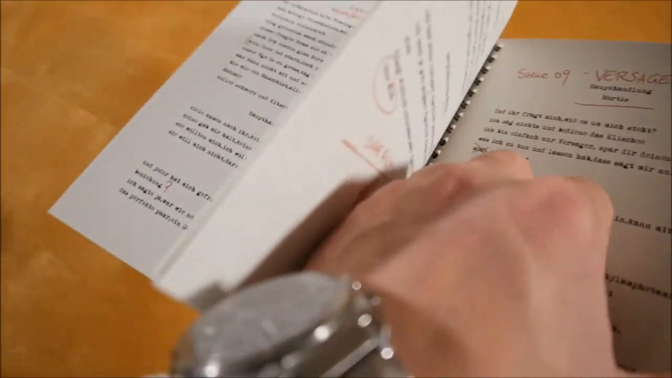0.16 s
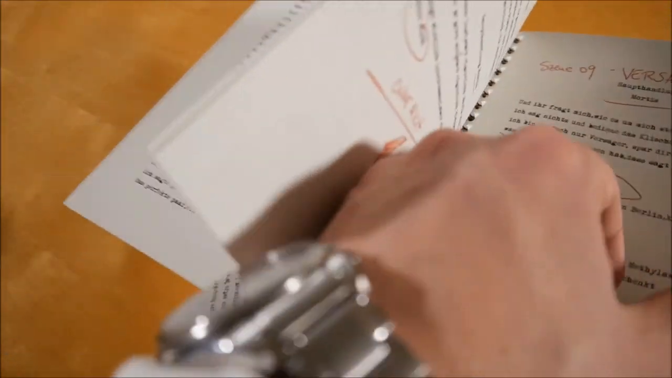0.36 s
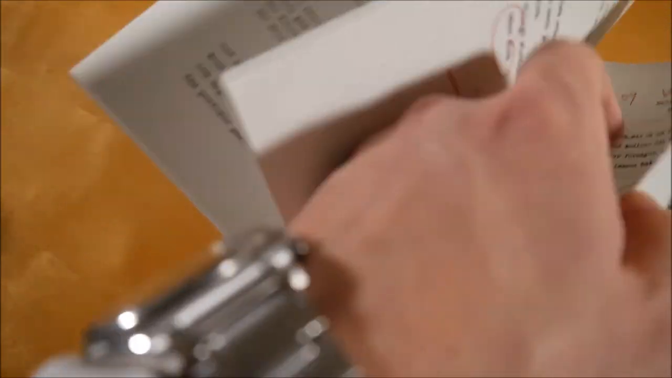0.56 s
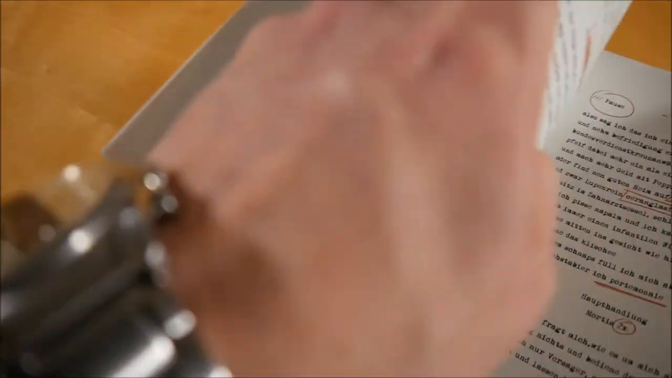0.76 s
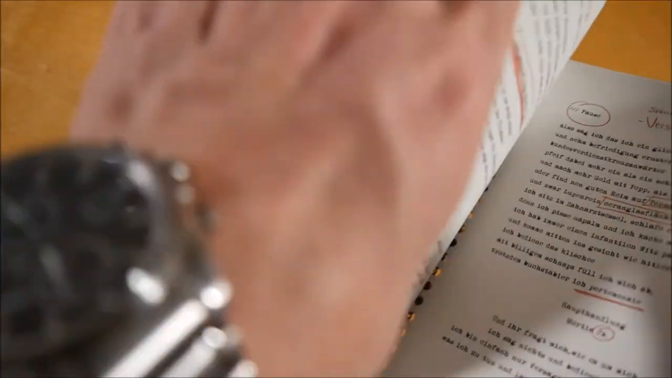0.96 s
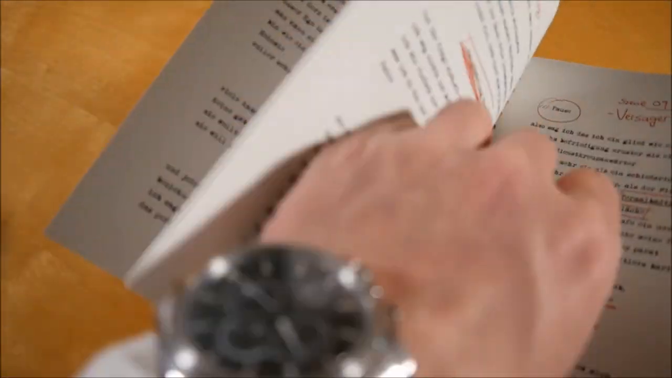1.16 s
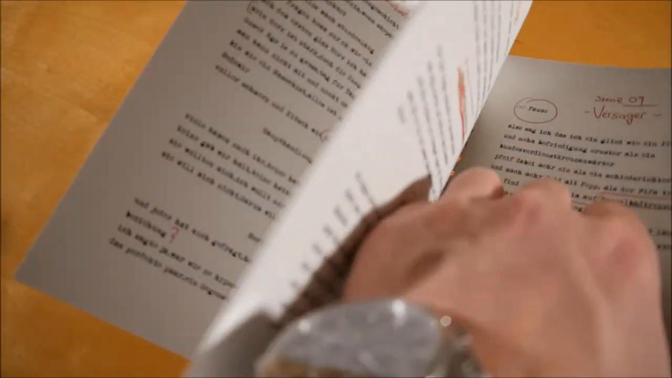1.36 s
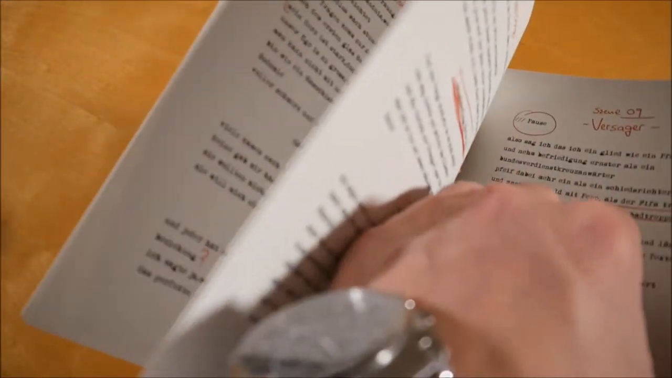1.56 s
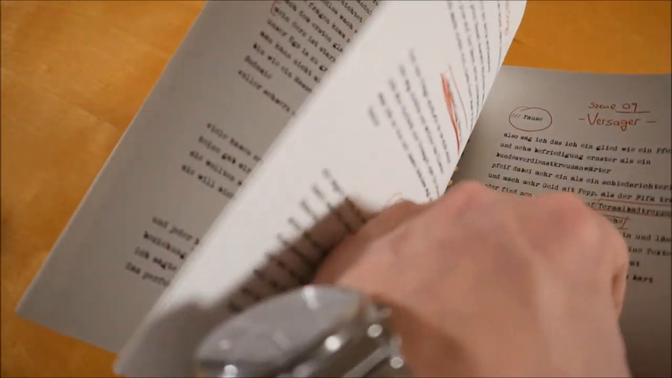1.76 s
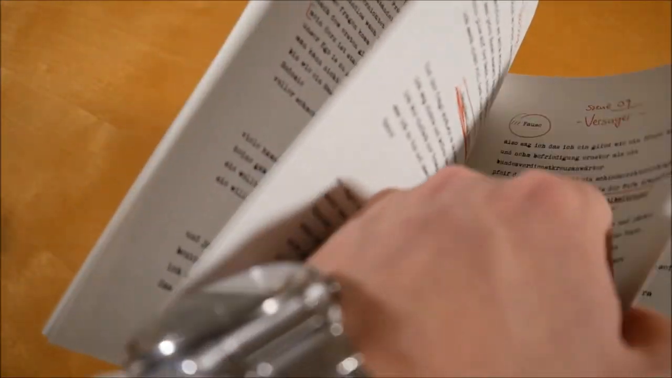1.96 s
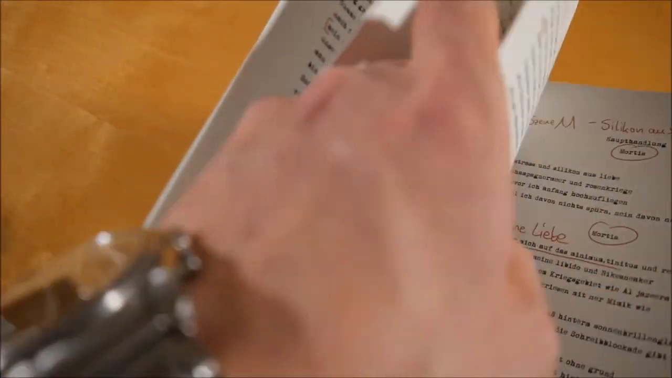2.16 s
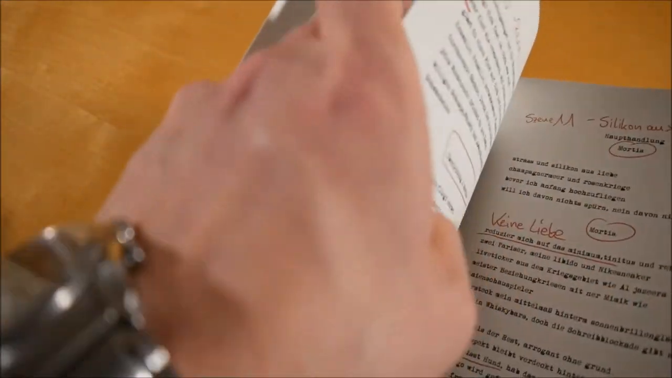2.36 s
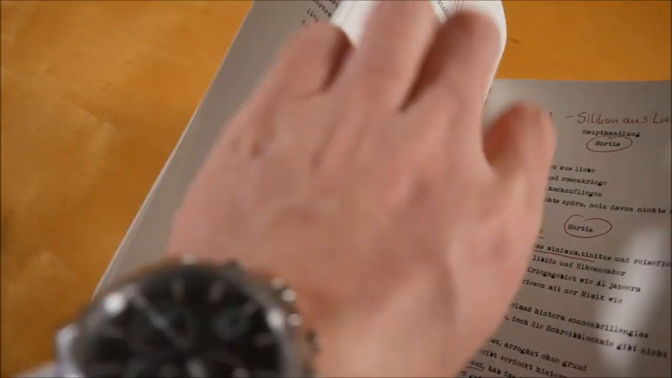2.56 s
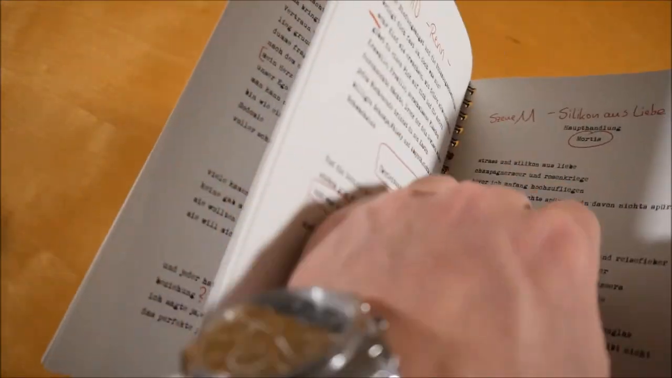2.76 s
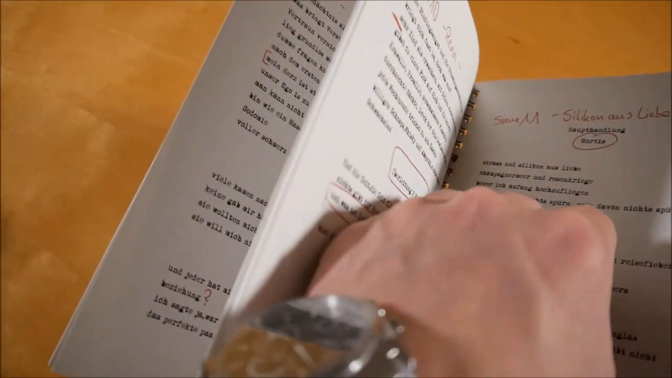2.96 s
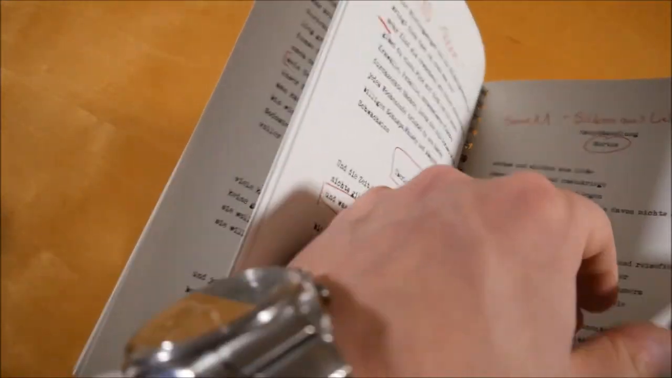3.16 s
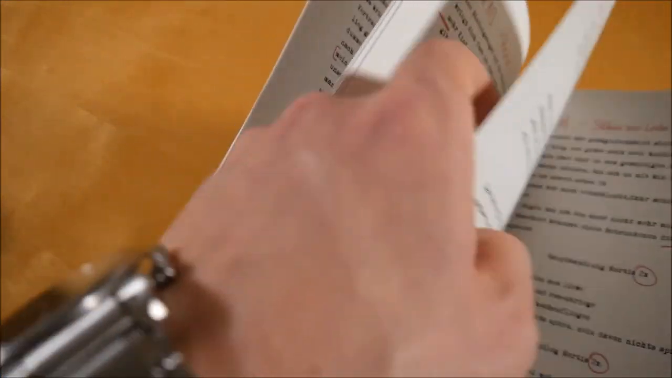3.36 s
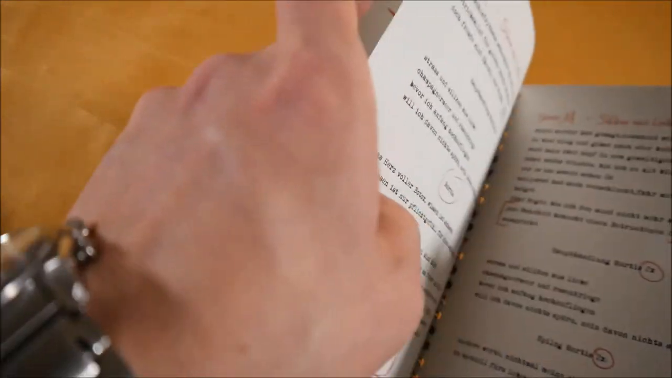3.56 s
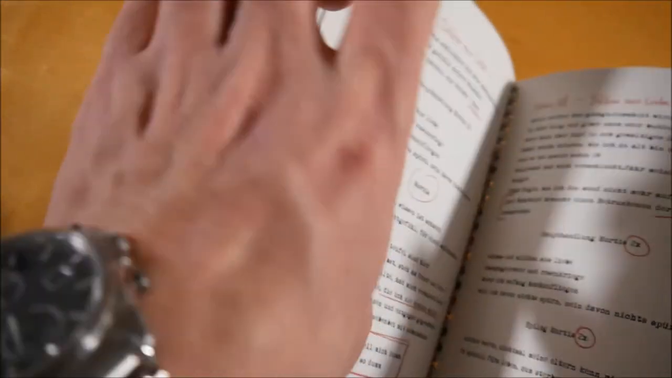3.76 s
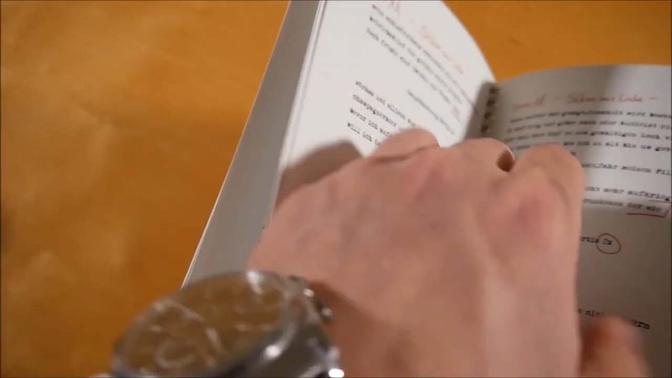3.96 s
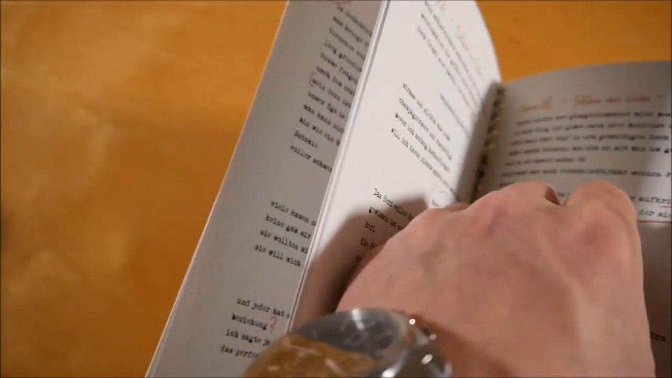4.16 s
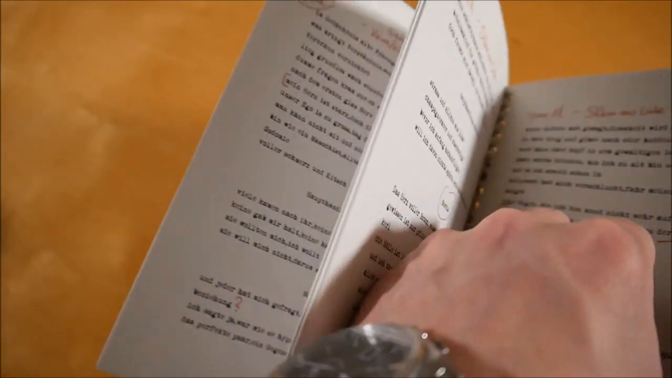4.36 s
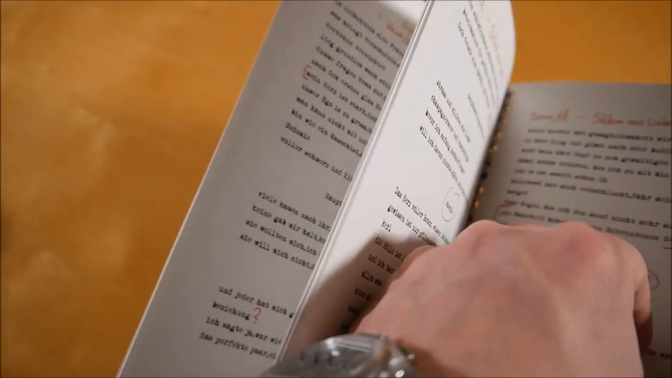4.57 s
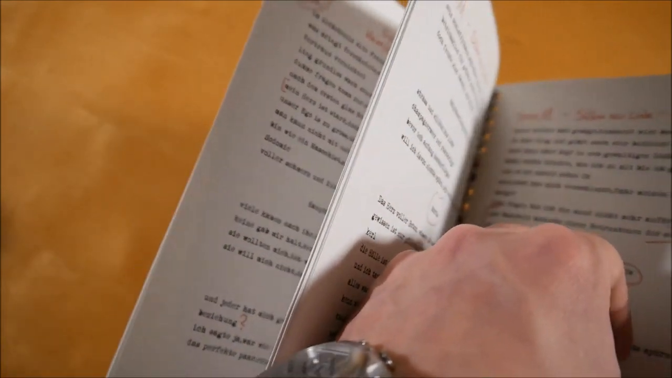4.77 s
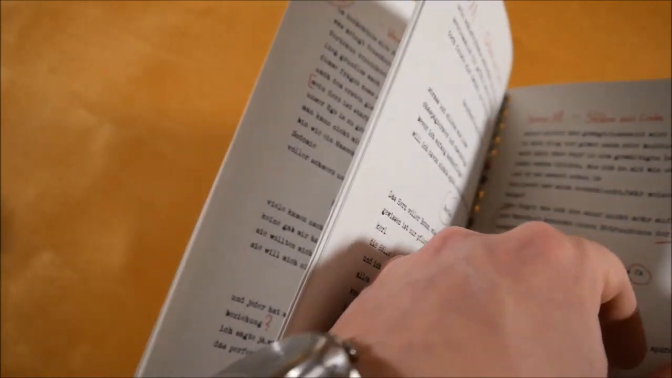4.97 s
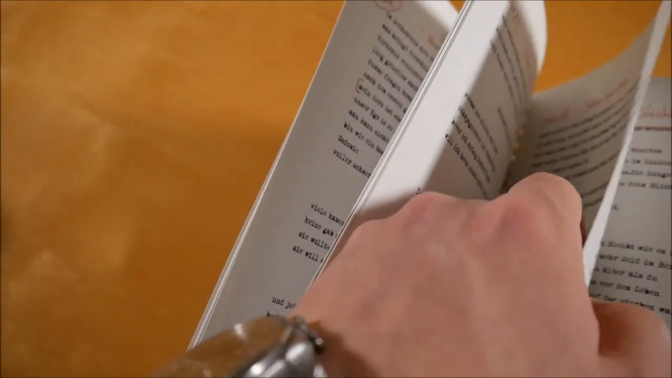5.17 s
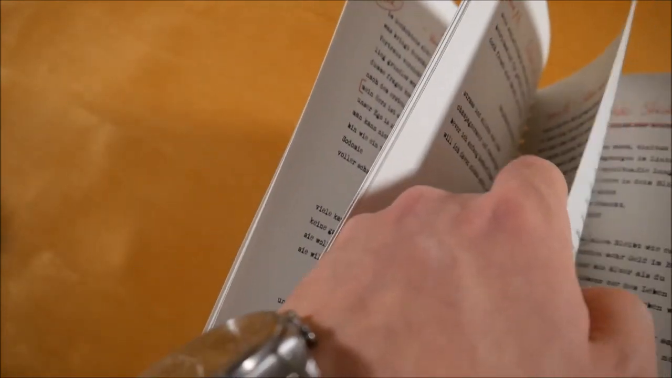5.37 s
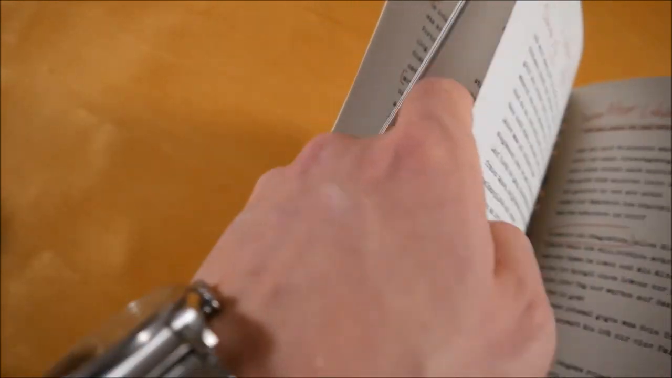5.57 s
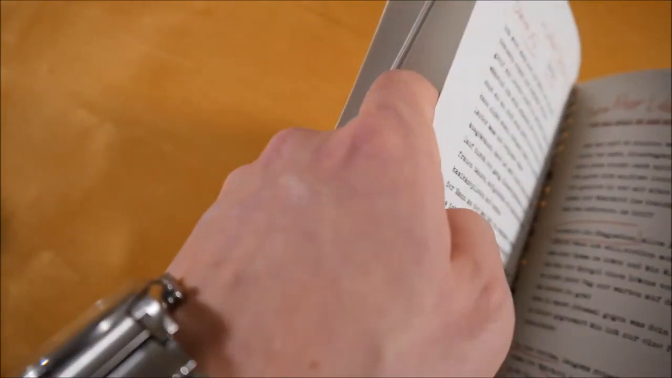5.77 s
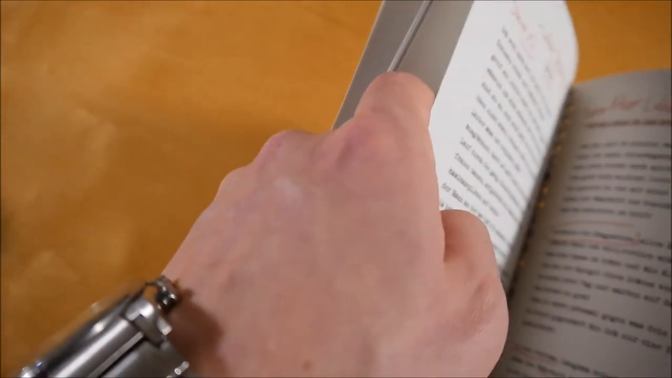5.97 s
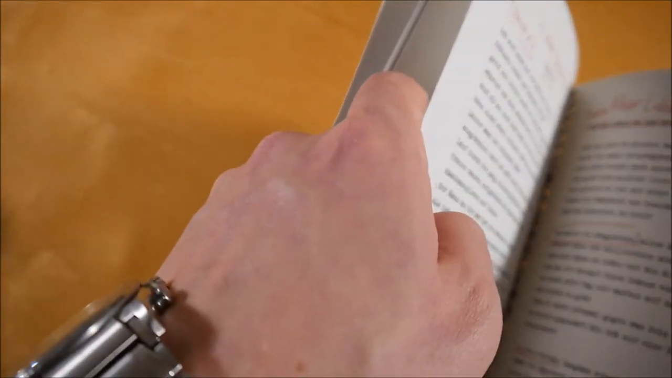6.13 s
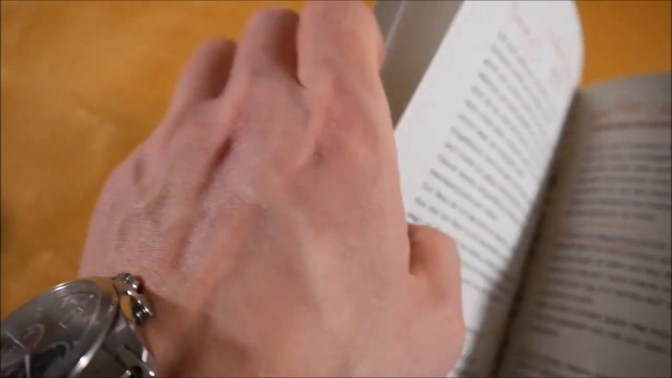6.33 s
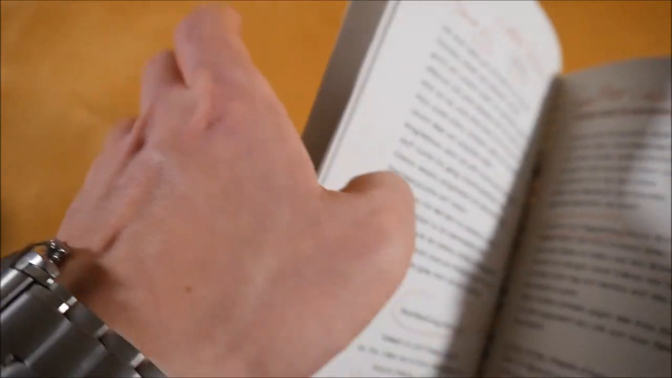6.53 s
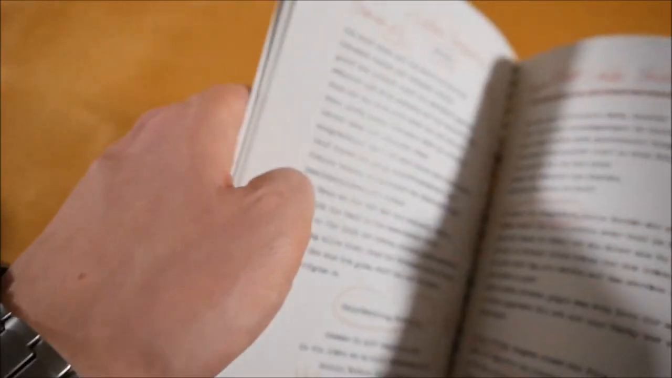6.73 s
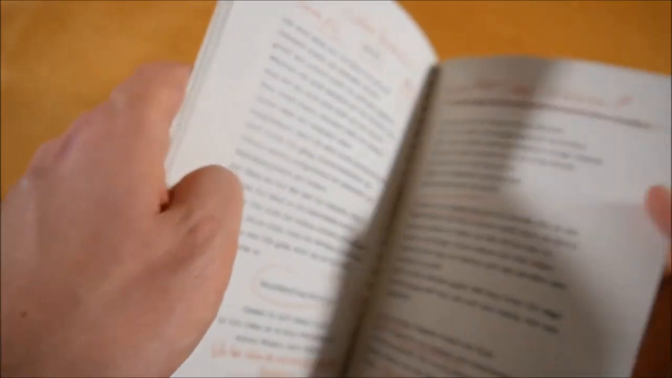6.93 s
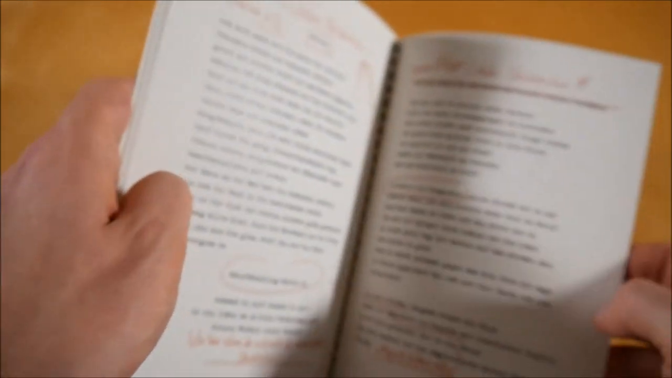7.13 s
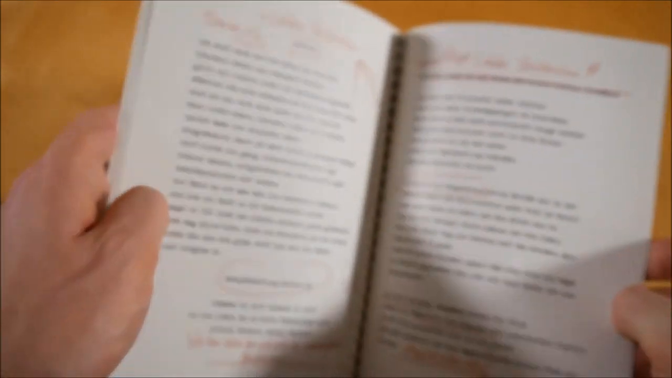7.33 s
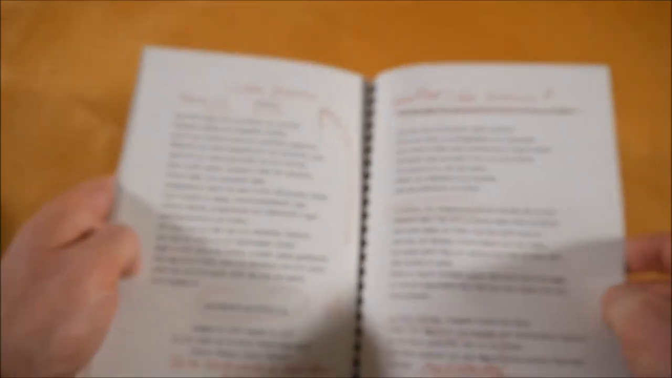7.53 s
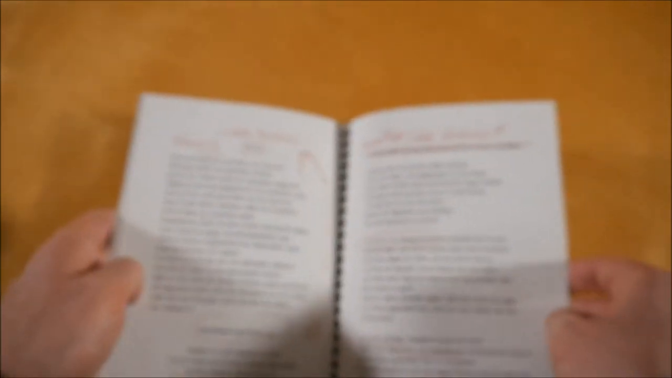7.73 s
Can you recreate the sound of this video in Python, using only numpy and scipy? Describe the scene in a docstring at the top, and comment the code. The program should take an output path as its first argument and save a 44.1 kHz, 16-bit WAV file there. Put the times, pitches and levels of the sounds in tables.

```python
"""Leafing through a spiral-bound booklet

A hand turns the pages of a paper booklet on a wooden desk, close by in a small, quiet room.
Filtered, crackly noise makes the sheets slide; short bursts make them snap and flop onto the stack.
A fingertip drags, or sticks and slips in short chirps. Decaying tones ring the plucked spiral and,
at the end, the desk under the knocking spine. A faint hum with quick ticks lies underneath."""
import sys
import numpy as np
from scipy import signal
from scipy.fft import rfft, irfft, next_fast_len
from scipy.io import wavfile

SR = 44100
rng = np.random.default_rng(int(sys.argv[2]) if len(sys.argv) > 2 else 0)


def pcm_store(signal):
    """Save signal as 16-bit PCM."""
    levels = np.round(np.clip(np.atleast_2d(signal), -1, 1) * 32767)
    wavfile.write(sys.argv[1], SR, levels.astype(np.int16).T)


N = 348390

# Colour of fibres that brush past each other. Each row: frequency in Hz, level in dB per Hz.
FIBRE_COLOUR = [(450, 3.5), (1100, 6), (4500, 1.5), (7500, -4)]


def from_db(db):
    """Decibels to gain."""
    return 10 ** (np.asarray(db) / 20)


def rms_one(x):
    """Scale to unit power."""
    return x / np.sqrt(np.mean(x ** 2) + 1e-20)


def at_hz(points, hz):
    """Read a spectrum on a log-frequency axis."""
    f, value = np.transpose(points)
    return np.interp(np.log(hz + 1), np.log(f), value)


def add(out, s, sound):
    """Mix a short sound in at time s, in seconds."""
    start = max(0, round(s * SR))
    part = out[..., start:start + sound.shape[-1]]
    part += sound[..., :part.shape[-1]]


def cut(x, hz, kind, order=2):
    """Butterworth low-pass ("low") or high-pass ("high")."""
    sections = signal.butter(order, np.clip(hz, 10, .45 * SR), kind, fs=SR, output="sos")
    return signal.sosfilt(sections, x)


def resonate(x, hz, width_hz):
    """One resonance with a gain of about 1 at its top."""
    r = np.exp(-np.pi * width_hz / SR)
    feedback = [1, -2 * r * np.cos(2 * np.pi * hz / SR), r * r]
    return signal.lfilter(np.array([1, 0, -1]) * (1 - r * r) / 2, feedback, x)


def resonate_twice(x, hz, width_hz):
    """The same resonance two times over, for steeper sides."""
    return resonate(resonate(x, hz, width_hz), hz, width_hz)


def drift(rate):
    """Smooth random wander of unit power that heads for a new value rate times a second."""
    knots = rng.standard_normal(4096)
    return rms_one(np.interp(np.arange(N) / SR * rate, np.arange(len(knots)), knots))


def spread(pair, spectrum):
    """Colour two unrelated signals and mix them to a left and right that agree least in the bass; rms 1."""
    # How alike left and right are. Each row: frequency in Hz, likeness from 0 to 1.
    likeness = [(200, 0.12), (1500, 0.65), (14000, 0.65)]
    size = next_fast_len(N + 4096)
    hz = np.arange(size // 2 + 1) * SR / size
    mid, side = rfft(pair, size) * from_db(at_hz(spectrum, hz))
    alike = np.clip(at_hz(likeness, hz), 0, .999)
    left_right = np.sqrt(1 + alike) * mid + np.sqrt(1 - alike) * side * [[1], [-1]]
    return rms_one(irfft(left_right, size)[:, :N])


def swell_and_fade(progress, peak, steepness=1.256):
    """The speed of a stroke: up from rest until the share peak of its length, then back to rest."""
    rise_and_fall = np.interp(progress, [0, np.clip(peak, .05, .9), 1], [0, 1, 0])
    return np.sin(np.pi / 2 * rise_and_fall) ** steepness


def disperse(x):
    """Bending waves cross a sheet treble first, so each click becomes a tiny falling chirp."""
    bend_lag_s = 0.001315   # sets the delay: it grows as 1 / sqrt(frequency) and is zero at the very top
    size = next_fast_len(len(x) + 4096)
    hz = np.arange(size // 2 + 1) * SR / size
    cycles = bend_lag_s * (2 * np.sqrt(1000 * hz) - hz * np.sqrt(2000 / SR))
    return irfft(rfft(x, size) * np.exp(-2j * np.pi * cycles), size)[:len(x)]


def friction(spectrum, catches_per_s, catch_db, judder_db):
    """Countless fibres brush past each other; some catch and let go with a tick, and the contact judders."""
    catches = (rng.random(N) < catches_per_s / SR) * rng.standard_normal((2, N))
    fibres = rng.standard_normal((2, N)) + from_db(catch_db) * rms_one(catches)
    judder = from_db(judder_db * np.clip(drift(110), -2, 2))
    return spread(fibres * judder, spectrum)


def ringing(blows, modes, t60_s):
    """Each blow sets the modes of a body ringing; they lose 60 dB in t60_s seconds."""
    out, t = np.zeros(N), np.arange(SR // 2) / SR
    ring = np.zeros(len(t))
    for k, (hz, db) in enumerate(modes):
        ring += (-1) ** k * from_db(db - 60 * t / t60_s) * np.sin(2 * np.pi * hz * t)
    for s, level_db in blows:
        add(out, s, from_db(level_db) * ring)
    return out


def quiet_room():
    """Steady, coloured noise is the hush of the room."""
    # Colour of the hush. Each row: frequency in Hz, level in dB per Hz.
    hush_colour = [(60, -25), (140, -13.5), (300, -19.5), (450, -20.5), (1500, -25), (15000, -38.5)]
    return from_db(-63.3) * spread(rng.standard_normal((2, N)), hush_colour)


def hum_and_ticks(tick_hz=790, hum_hz=208, tick_db=-69, hum_db=-68.5):
    """Narrow noise makes a faint hum; noise bursts that die away 25 times a second make faint ticks."""
    since_tick = (np.arange(N) / SR - .026) % .04
    noise = rng.standard_normal((2, N))
    ticks = resonate_twice(noise[0] * np.exp(-since_tick / .016), tick_hz, 380)
    hum = resonate_twice(noise[1], hum_hz, 40)
    return from_db(tick_db) * rms_one(ticks) + from_db(hum_db) * rms_one(hum)


def room(x, dull_hz=7000, shared=0.92, build_s=0.00067, t60_s=0.26):
    """Reflections from desk and walls thicken and die away, the treble first."""
    t = np.arange(SR // 2) / SR
    noise = rng.standard_normal((3, len(t)))
    echoes = cut(shared * noise[0] + noise[1:], 123, "high")
    lows = cut(echoes, dull_hz, "low", order=1)
    highs = (echoes - lows) * from_db(-90 * t)   # an extra loss of 90 dB a second
    tail = (lows + highs) * from_db(-60 * t / t60_s) * (1 - np.exp(-t / build_s))
    return signal.fftconvolve(x, rms_one(tail) / np.sqrt(len(t)), axes=1)[:, :N]


def desk_knocks():
    """The spine knocks on the desk, and the desk top rings."""
    # Knocks. Each row: time in seconds, level in dB.
    knock_times = [(7.743, -37), (7.766, -34)]
    # Tones of the desk top. Each row: frequency in Hz, level in dB.
    desk_modes = [(168, -5), (214, -4), (286, 1), (380, -2)]
    return ringing(knock_times, desk_modes, t60_s=0.14)


def spiral_plucks():
    """A sheet catches in the spiral and plucks it, and the coil rings."""
    # Plucks. Each row: time in seconds, level in dB.
    pluck_times = [(.689, -22), (.7055, -28)]
    # Tones of the coil. Each row: frequency in Hz, level in dB.
    coil_modes = [(1258, 0), (1746, -7), (1890, -6)]
    return ringing(pluck_times, coil_modes, t60_s=.15)


def stutter(start, length_s, count, first_db, last_db, hz):
    """The finger speeds up and slows, so slips crowd and weaken midway; rows (s, peak dB, Hz)."""
    midway_gap = 0.5      # gap between slips at the fastest point, as a share of the mean gap
    midway_loss_db = 8    # quick slips store less strain
    tightening = 0.09     # share by which the pitch rises over a run as the page is pulled taut
    way = np.linspace(-1, 1, round(count))
    times = start + length_s * (1 + midway_gap * way + (1 - midway_gap) * way * way * way) / 2
    levels_db = np.linspace(first_db, last_db, len(way)) - midway_loss_db * (1 - way * way)
    return zip(times, levels_db, hz * (1 + tightening * (1 + way) / 2))


def slips(swell_s=0.00083, rasp=16, overshoot=0.984, sag_s=0.0004):
    """Each slip shakes the page in a few cycles that sag to its pitch; hard slips rasp, gentle ones chirp."""
    # Runs of slips of a fingertip. Each row: start in seconds, length in seconds, number of slips,
    # level of the first slip in dB, level of the last slip in dB, starting pitch in Hz.
    slip_runs = [(.938, 0.017, 2, -23, -9.5, 2600), (2.188, 0.125, 11, -29, -27, 1830),
                 (2.4895, .026, 2, -22, -29, 1700)]
    out, t = np.zeros(N), np.arange(SR // 40) / SR
    swell = np.sqrt(t / swell_s) * np.exp(-t / swell_s / 2)
    bent_t = t + overshoot * sag_s * (1 - np.exp(-t / sag_s))   # time runs fast at first: a higher pitch
    for run in slip_runs:
        for s, level_db, hz in stutter(*run):
            scratch = rms_one(resonate_twice(rng.standard_normal(len(t)), hz, .8 * hz))
            chirp = swell * (np.sin(2 * np.pi * hz * bent_t) + rasp * from_db(level_db) * scratch)
            add(out, s, from_db(level_db) * chirp / np.abs(chirp).max())
    return out


def drags(grain_db=-2):
    """A pressed fingertip scrapes in one resonance over a crackly grain; it swells slowly and stops sooner."""
    # Drags along a page held flat. Each row: start in seconds, length in seconds, level in dB,
    # centre of the scrape in Hz, width of the scrape in Hz.
    drag_strokes = [(1.075, .125, -41, 2200, 2600), (2.378, .026, -41, 2500, 2400),
                    (2.612, .075, -42.5, 2100, 1900), (3.87, .11, -46, 1380, 620),
                    (6.18, .22, -50.5, 2000, 3400), (6.73, .26, -49.5, 1420, 900)]
    skin = friction(FIBRE_COLOUR, catches_per_s=540, catch_db=-1.5, judder_db=2)
    out = np.zeros((2, N))
    for start, length_s, level_db, hz, width_hz in drag_strokes:
        i = np.arange(int(start * SR), int((start + length_s) * SR))
        grain = rms_one(cut(skin[:, i], hz, "low", order=1))
        scrape = rms_one(resonate_twice(skin[:, i], hz, width_hz)) + from_db(grain_db) * grain
        speed = swell_and_fade((i / SR - start) / length_s, peak=0.63)
        add(out, start, from_db(level_db) * speed * scrape)
    return out


def flops(patter_db=-24, soft_hz=2200):
    """A landing page squeezes out air and patters to rest; a heavy hand thuds lower than a sheet."""
    # Landings on the stack. Each row: time in seconds, peak level in dB, lowest pitch of the thud in Hz.
    landings = [(0.392, -31.5, 85), (.799, -15.5, 169), (1.003, -29.5, 114), (1.39, -39, 97),
                (2.541, -26, 222), (2.868, -33.5, 72), (3.788, -27.5, 83), (4.127, -31, 84),
                (4.425, -41.5, 75), (4.467, -24.5, 108), (5.172, -38, 130), (5.66, -25.5, 207),
                (7.766, -21.5, 300)]
    # Air cushion and stack under a page. Each row: frequency in Hz, level in dB, time to fall 60 dB in seconds.
    stack_modes = [(136, -10.5, 0.018), (242, 9, 0.0031), (676, -2.5, 0.0068)]
    out, t = np.zeros(N), np.arange(SR // 5) / SR
    modes = sum(from_db(db - 60 * t / t60) * np.sin(2 * np.pi * hz * t) for hz, db, t60 in stack_modes)
    for s, level_db, lowest_hz in landings:
        settle_s = 0.0022 * 2 ** (-level_db / 12.5)   # a landing 12.5 dB harder settles in half the time
        patter = from_db(patter_db) * np.exp(-t / settle_s) * rng.standard_normal(len(t))
        push = (t == 0) + patter
        thud = cut(signal.fftconvolve(push, modes)[:len(t)], soft_hz, "low")
        thud = cut(thud, lowest_hz, "high", order=3)
        add(out, s, from_db(level_db) * thud / np.abs(thud).max())
    return out


def snap(hz, crisp_db, ripple_db=-17, ripple_cycles=2.55, shiver_db=-33, shiver_s=0.026,
         width=0.96, crack_hz=4000):
    """A patch of paper flips in one jolt; bending waves ripple back and the sheet shivers on."""
    t = np.arange(SR // 8) / SR
    ripple = from_db(ripple_db) * np.exp(-t * hz / ripple_cycles)
    ripple = ripple + from_db(shiver_db) * np.exp(-t / shiver_s)
    # one noise shared by both sides, plus a little of its own for each
    noise = rng.standard_normal(len(t)) + 0.35 * rng.standard_normal((2, len(t)))
    force = (t == 0) + ripple * noise
    body = cut(resonate(force, hz, width * hz), hz * 0.15, "high")
    body = cut(body, hz * 7, "low", order=1)
    crack = resonate(force, crack_hz, 1600) - from_db(-4) * resonate(force, 7700, 6600)
    both = body / np.abs(body).max() + from_db(crisp_db) * crack / np.abs(crack).max()
    sound = np.array([disperse(side) for side in both])
    return sound / np.abs(sound).max()


def snaps():
    """Sheets buckle or flick their edges free; the gentler the snap, the crisper."""
    # Snaps. Each row: time in seconds, peak level in dB, pitch of the bent patch in Hz.
    snap_events = [(0.0116, -10.5, 1310), (0.03, -17.5, 1680), (.042, -17.5, 1190), (.085, -17.5, 1470),
                   (0.108, -14, 4070), (.119, -17.5, 3970), (0.1415, -14, 4540), (0.156, -19.5, 4900),
                   (0.324, -25, 850), (0.366, -26, 1660), (0.45, -27, 780), (0.521, -23, 2600),
                   (.555, -24, 4130), (.623, -20, 1090), (0.6702, -18.5, 2370), (0.6811, -10.5, 1880),
                   (0.6877, -8.5, 1430), (0.7049, -2, 1430), (.748, -13, 3560), (0.7984, -17.5, 1220),
                   (1.566, -38, 1920), (1.614, -37, 2270), (2.033, -10.5, 1570), (2.121, -20.5, 2900),
                   (2.139, -10.5, 2500), (2.541, -20.5, 1270), (3.193, -21, 4400), (3.215, -22.5, 2780),
                   (3.338, -26, 4000), (3.579, -27.5, 4470), (3.607, -27, 4970), (3.618, -28, 3000),
                   (3.632, -30, 5170), (3.667, -22.5, 2300), (3.725, -18, 3900), (3.737, -36, 2500),
                   (3.884, -21, 1440), (3.899, -26.5, 1500), (3.931, -22.5, 1760), (3.943, -27, 2160),
                   (4.127, -29, 965), (4.175, -27.5, 2420), (4.217, -31, 1180), (4.296, -30, 1500),
                   (4.4552, -18, 1220), (4.468, -27, 1260), (5.041, -29.5, 3800), (5.11, -27, 1790),
                   (5.166, -29, 1520), (5.237, -31.5, 4450), (5.567, -43, 4500), (5.6576, -13, 1160),
                   (6.411, -29.5, 1780), (6.419, -23, 1300), (6.434, -20.5, 1630), (6.722, -36, 2200),
                   (7.393, -36.5, 2330), (7.548, -35.5, 2900), (7.74, -17, 1000), (7.764, -16.5, 1190),
                   (7.860, -25.5, 1650), (7.865, -25, 1670)]
    out = np.zeros((2, N))
    for s, level_db, hz in snap_events:
        crisp_db = -33.5 - 0.3 * level_db   # the bright crack gains 0.3 dB for each dB gentler
        add(out, s, from_db(level_db) * snap(hz, crisp_db))
    return out


def crinkle(size_spread_db=4.5, flurry_db=4, dullness=0.79):
    """Tiny creases give way in flurries, each with a random size and one of twelve pitches; rms 1."""
    sizes = from_db(size_spread_db * np.minimum(rng.exponential(1, N), 2)) * rng.choice([-1, 1], N)
    creases_per_s = 95 * from_db(flurry_db * drift(20))
    ticks = sizes * (rng.random(N) < creases_per_s / SR)
    pitches_hz = np.geomspace(900, 7000, 12)
    dealt = rng.integers(0, len(pitches_hz), N)
    out = np.zeros(N)
    for k, hz in enumerate(pitches_hz):
        # the tiny offset keeps the filter clear of extremely small numbers
        out += resonate(ticks * (dealt == k) + 1e-18, hz, .5 * hz) / hz ** dullness
    return rms_one(disperse(out))


def under_page(pair):
    """An echo from the changing gap under the moving page keeps shifting the colour of the rub."""
    n = np.arange(N)
    lag = 0.000483 * SR * np.exp(0.41 * drift(12))   # in samples
    echo = np.array([np.interp(n - lag, n, channel) for channel in pair])
    return rms_one(pair - from_db(-11) * echo)


def sliding(flex_db=-11, flex_steepness=3.02, crumple_db=-41):
    """Strokes speed up and come to rest; the more of a sheet moves, the lower it rubs and rumbles along."""
    # Strokes of a finger or sheet over paper. Each row: start in seconds, length in seconds,
    # rub level in dB, centre of the rub in Hz, hiss level in dB.
    slide_strokes = [(.0, 0.25, -37, 944, -40), (0.224, 0.37, -50.5, 1300, -56),
                     (0.427, 0.15, -44.5, 1130, -56), (0.563, 0.22, -42, 1340, -47.5),
                     (0.672, 0.17, -40, 2430, -42), (0.727, 0.43, -42.5, 1840, -52),
                     (0.973, 0.076, -42, 2090, -72), (1.105, 0.38, -50.5, 2190, -52),
                     (1.332, 1, -62.5, 1800, -70), (1.987, 0.44, -47.5, 1940, -54),
                     (2.39, 0.32, -48, 1950, -54), (2.657, 0.31, -50.5, 2660, -51),
                     (3.21, 0.11, -41, 1450, -54), (3.3, 0.1, -48, 1630, -48.5),
                     (3.372, 0.2, -46, 3360, -53.5), (3.512, 0.48, -47.5, 1820, -53.5),
                     (3.713, 0.15, -38.5, 1430, -45), (3.94, 0.085, -38.5, 1430, -41.5),
                     (3.948, 0.34, -57, 1970, -53.5), (4.189, 0.64, -54, 1010, -58.5),
                     (4.351, 0.027, -45.5, 1260, -46), (4.637, 0.061, -41.5, 1460, -61),
                     (4.716, 0.054, -47, 950, -53), (4.972, 0.56, -51, 1740, -66),
                     (5.12, 0.17, -53, 1450, -60), (5.41, 0.39, -48.5, 3020, -61),
                     (6.256, 0.29, -52, 1880, -55.5), (6.983, 0.052, -51, 1060, -67),
                     (6.998, 0.36, -53, 1450, -53), (7.377, 0.25, -47, 2050, -65),
                     (7.59, 0.1, -44, 1110, -52.5), (7.68, 0.84, -48.5, 1050, -57)]
    # Colour of a bending sheet. Each row: frequency in Hz, level in dB per Hz.
    flex_colour = [(50, -9.5), (160, 6.5), (480, 6), (720, 7.5), (1100, -4), (1800, -100.5)]
    # Colour of sheet sliding over sheet. Each row: frequency in Hz, level in dB per Hz.
    hiss_colour = [(4000, -5), (5500, 2), (6800, 0.5), (8200, -2), (10500, 2), (15500, -14.5)]
    flex = friction(flex_colour, catches_per_s=180, catch_db=-12.0, judder_db=6.0)
    rub = under_page(friction(FIBRE_COLOUR, catches_per_s=500, catch_db=-5, judder_db=2.5))
    hiss = friction(hiss_colour, catches_per_s=1200, catch_db=-8, judder_db=1.8)
    creases, out = crinkle(), np.zeros((2, N))
    for start, length_s, rub_db, hz, hiss_db in slide_strokes:
        i = np.arange(max(0, int(start * SR)), min(N, int((start + length_s) * SR)))
        progress = (i / SR - start) / length_s
        size = 1500 / hz   # how much of the sheet moves
        scrape = rms_one(resonate(rub[:, i], hz, 1.5 * hz))
        rumble = from_db(flex_db) * size ** flex_steepness * flex[:, i]
        # forceful strokes crumple the sheet; gentle ones only brush it
        crumple = from_db(.55 * (rub_db - crumple_db)) * min(size, 1)
        rubbing = from_db(rub_db) * (scrape + rumble + crumple * creases[i]) / np.hypot(1, crumple)
        hissing = from_db(hiss_db) * hiss[:, i]
        speed = swell_and_fade(progress, peak=0.13)
        add(out, start, speed * (rubbing + hissing))
    return out


def scene():
    """The booklet, a little to the right, in a quiet room; light paper radiates little bass."""
    # Resonances of the open booklet and the desk under it. Each row: frequency in Hz, width in Hz, level in dB.
    book_resonances = [(320, 140, -6.5), (675, 150, -0.5)]
    paper = sliding() + drags() + snaps() + flops() + slips()
    body = sum(from_db(db) * resonate(paper, hz, width_hz) for hz, width_hz, db in book_resonances)
    booklet = cut(paper + body, 70, "high")
    booklet = booklet + spiral_plucks() + desk_knocks()
    pan_db = -1.86   # left minus right
    heard = (booklet + from_db(-11) * room(booklet)) * from_db(pan_db * np.array([[.5], [-.5]]))
    return heard + hum_and_ticks() + quiet_room()


def record(dry):
    """The housing scatters treble unequally into two microphone ports and leaves a dip; the top is cut."""
    scattered = np.roll(resonate(dry.mean(axis=0), 13500, 4500), 4)   # four samples late
    unequal = from_db(-16) * scattered + from_db(-13) * resonate(dry, 6000, 3500)
    ports = dry + unequal * [[1], [-1]]
    coloured = ports - 0.64 * resonate(ports, 7900, 500)
    top_cut = signal.ellip(10, .1, 80, 15400, fs=SR, output="sos")   # steep low-pass at 15400 Hz
    return signal.sosfilt(top_cut, coloured)


dry = scene()
out = record(dry)
pcm_store(out)
```